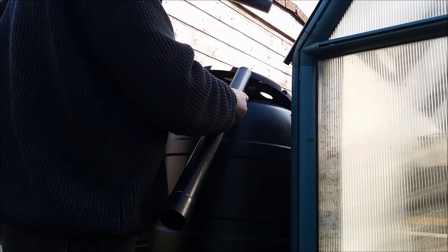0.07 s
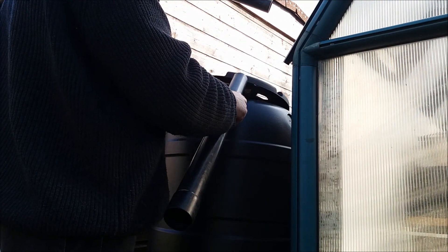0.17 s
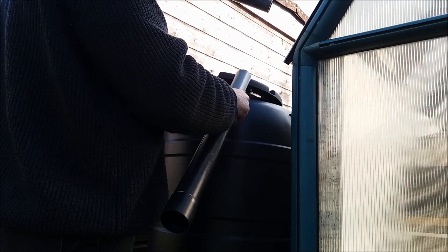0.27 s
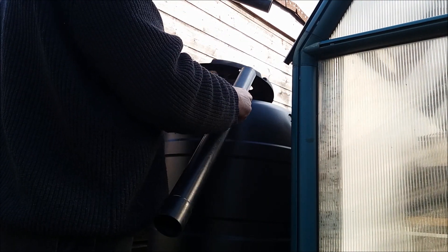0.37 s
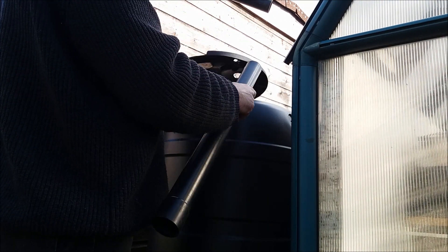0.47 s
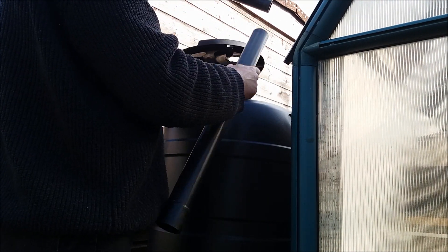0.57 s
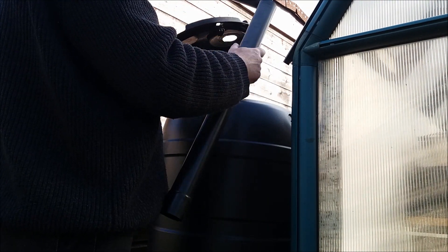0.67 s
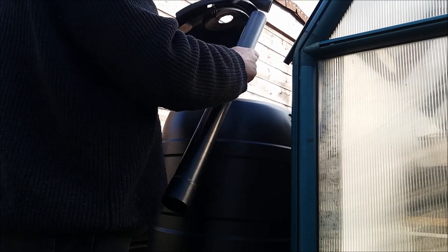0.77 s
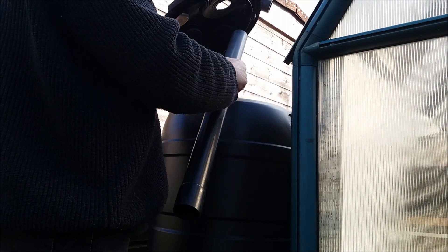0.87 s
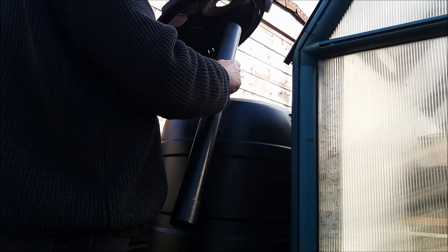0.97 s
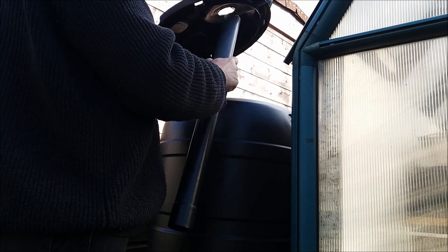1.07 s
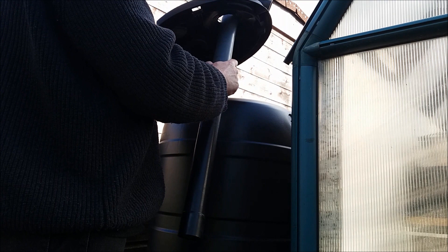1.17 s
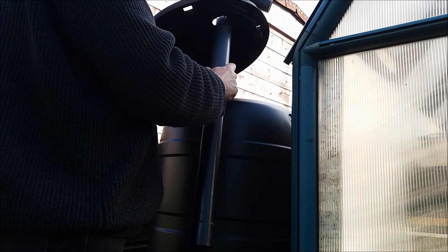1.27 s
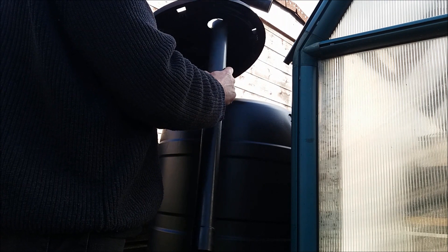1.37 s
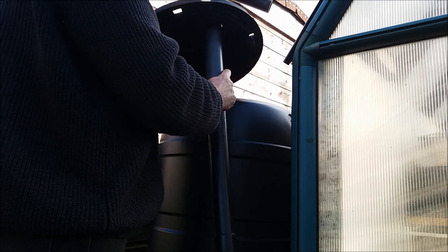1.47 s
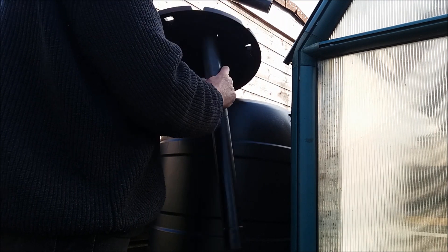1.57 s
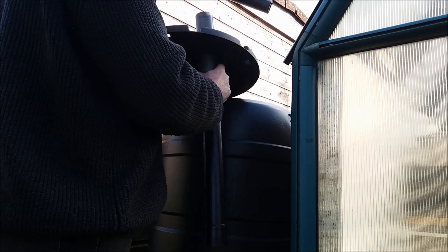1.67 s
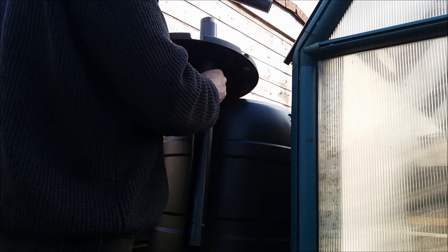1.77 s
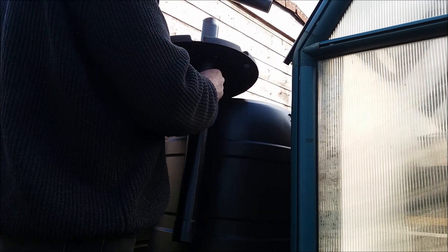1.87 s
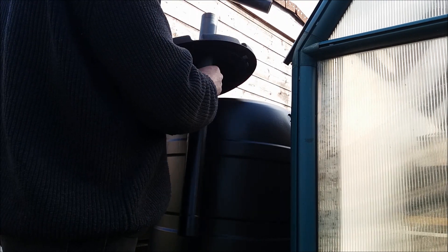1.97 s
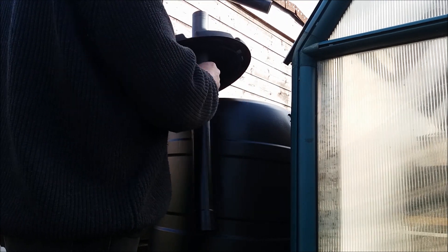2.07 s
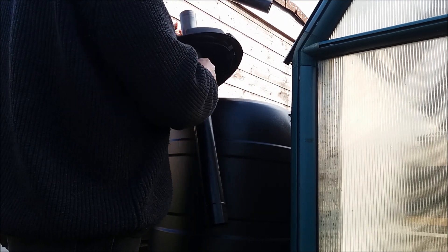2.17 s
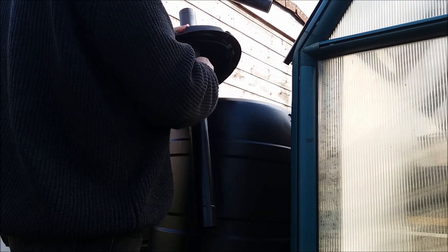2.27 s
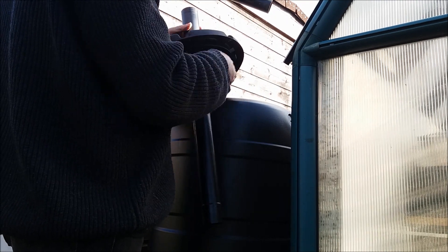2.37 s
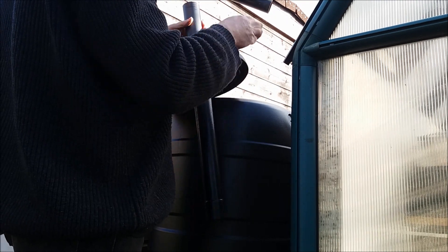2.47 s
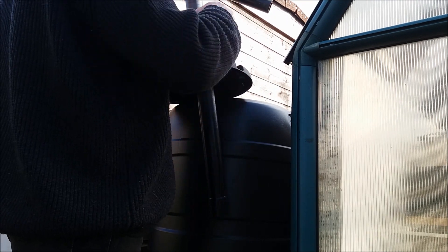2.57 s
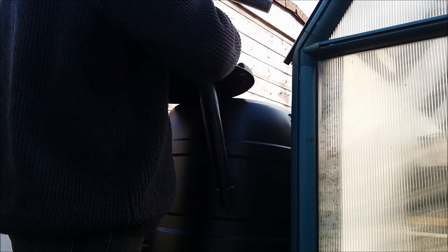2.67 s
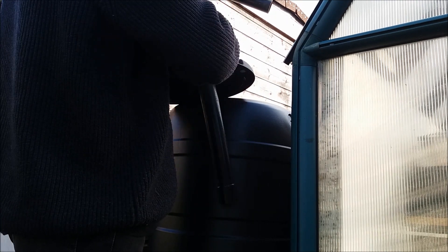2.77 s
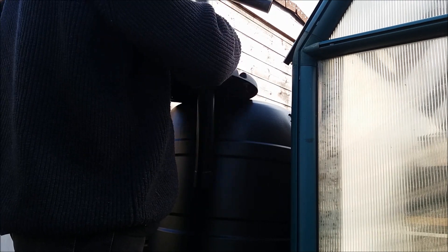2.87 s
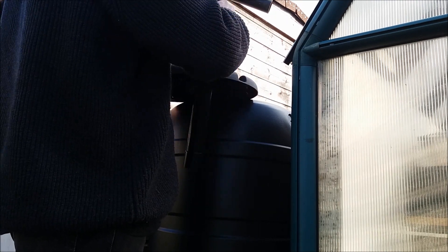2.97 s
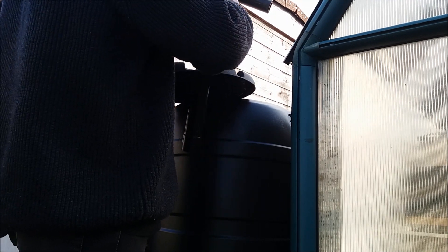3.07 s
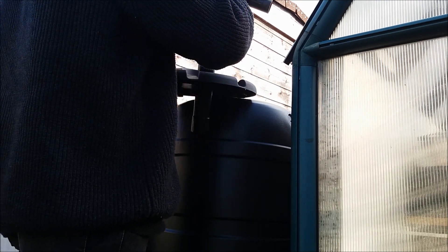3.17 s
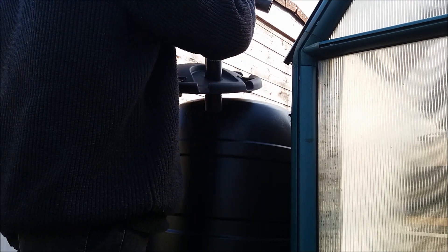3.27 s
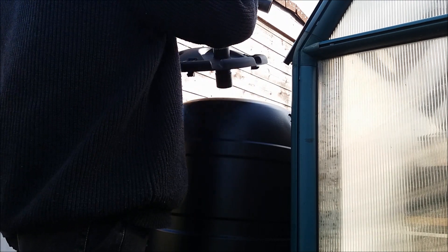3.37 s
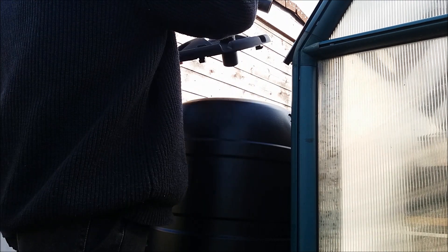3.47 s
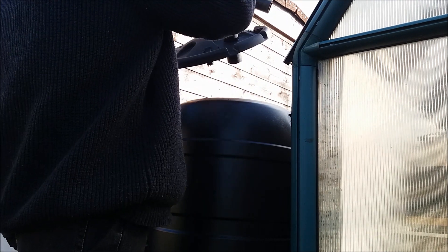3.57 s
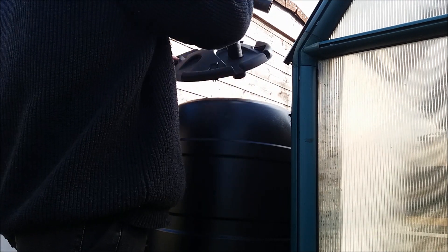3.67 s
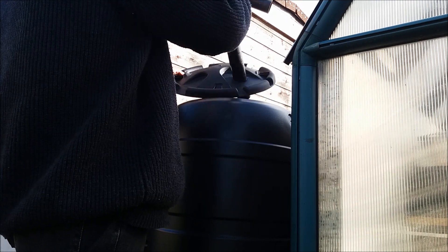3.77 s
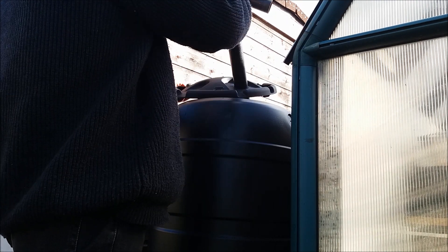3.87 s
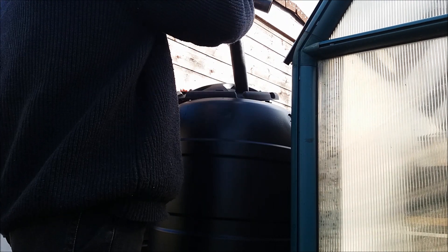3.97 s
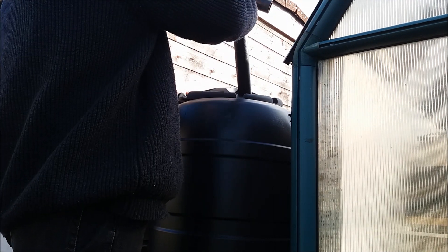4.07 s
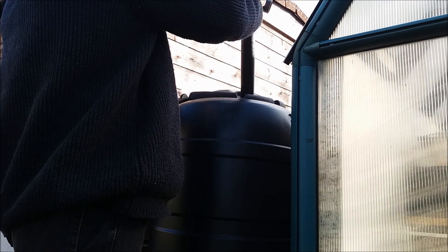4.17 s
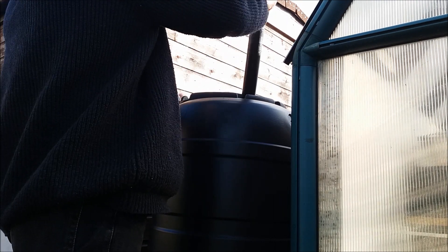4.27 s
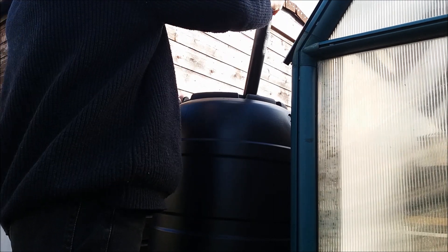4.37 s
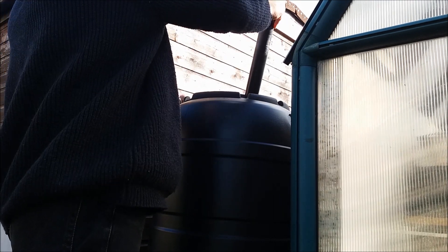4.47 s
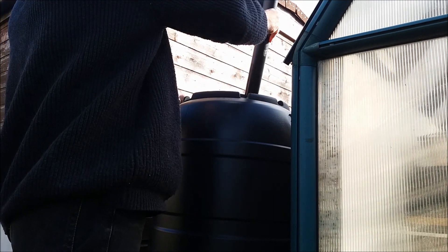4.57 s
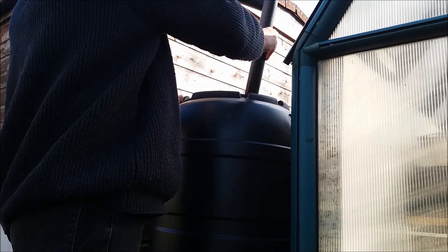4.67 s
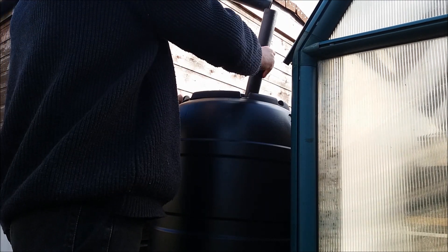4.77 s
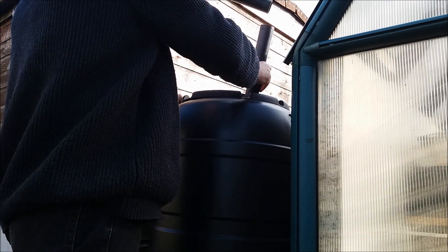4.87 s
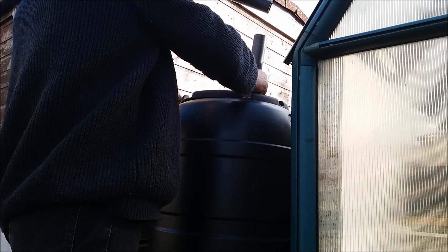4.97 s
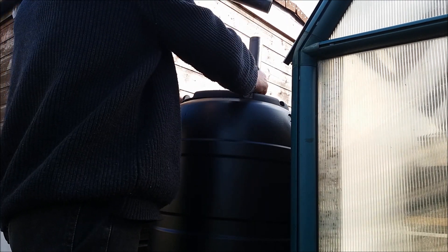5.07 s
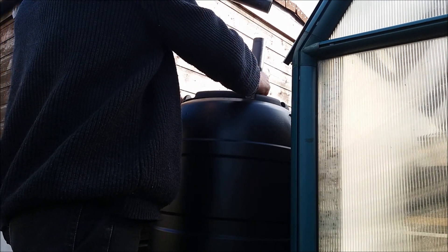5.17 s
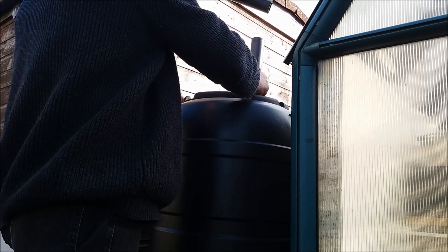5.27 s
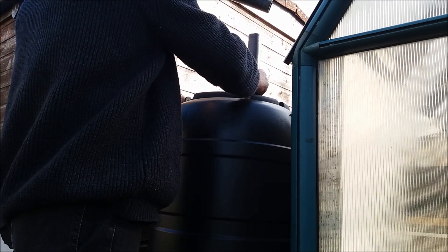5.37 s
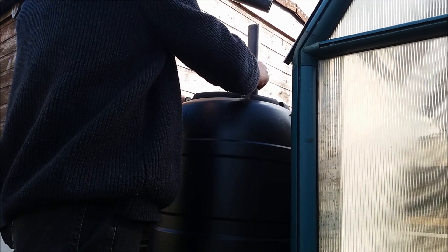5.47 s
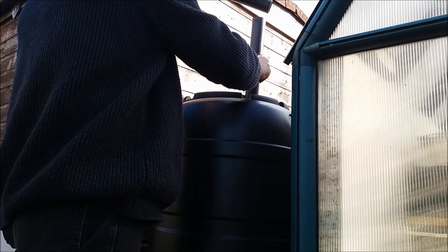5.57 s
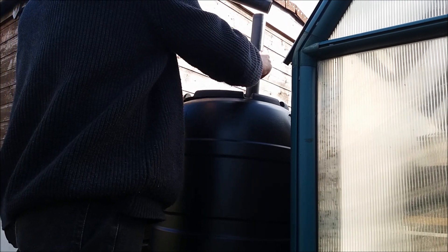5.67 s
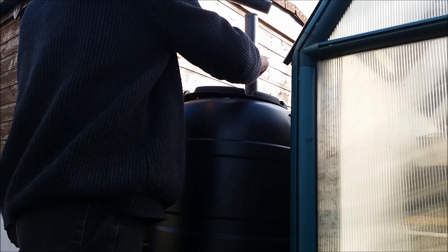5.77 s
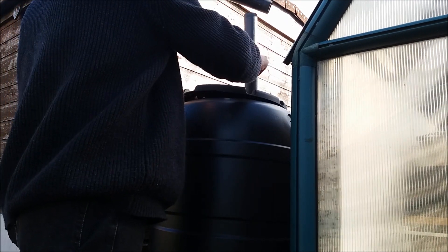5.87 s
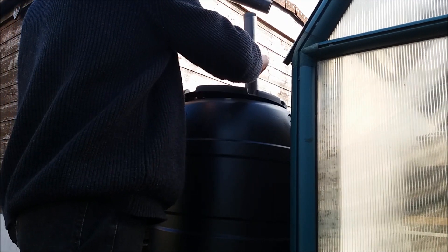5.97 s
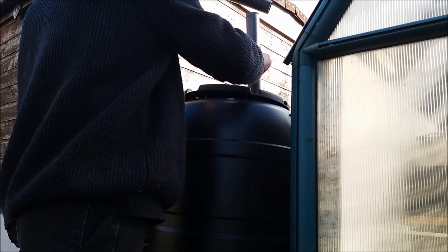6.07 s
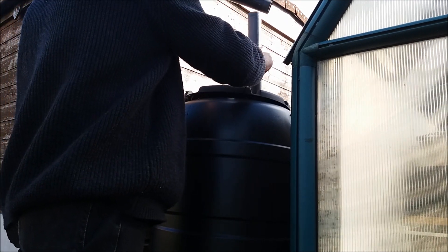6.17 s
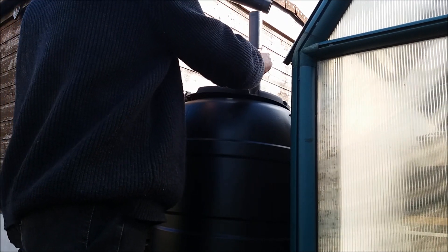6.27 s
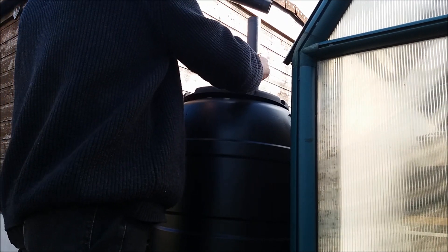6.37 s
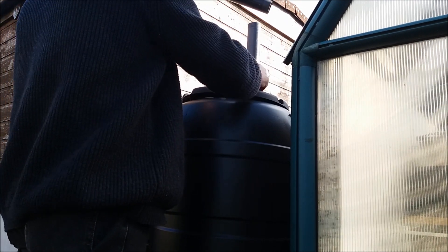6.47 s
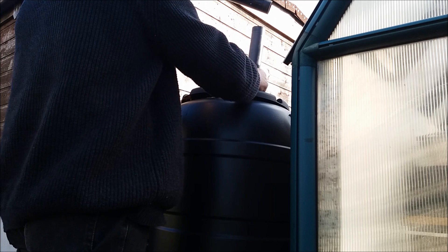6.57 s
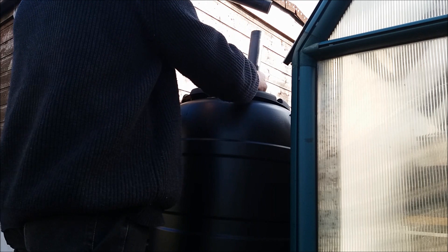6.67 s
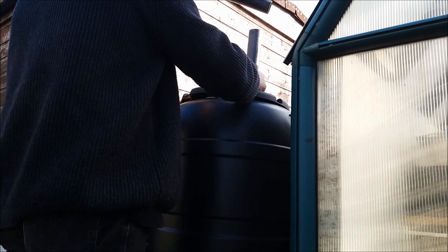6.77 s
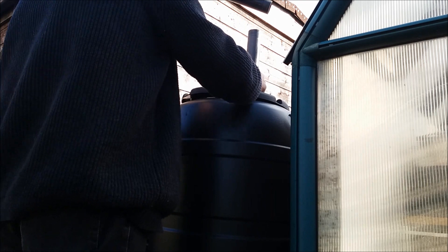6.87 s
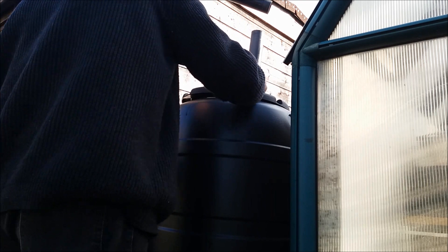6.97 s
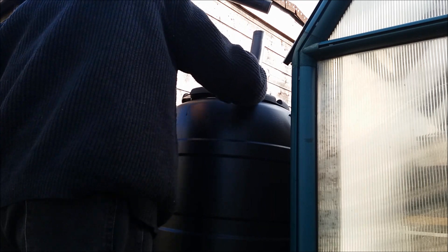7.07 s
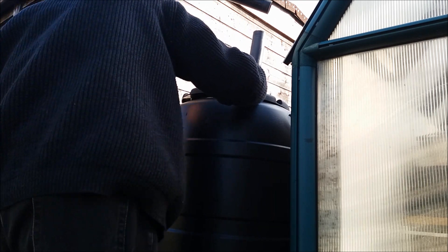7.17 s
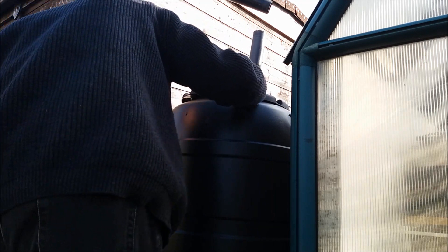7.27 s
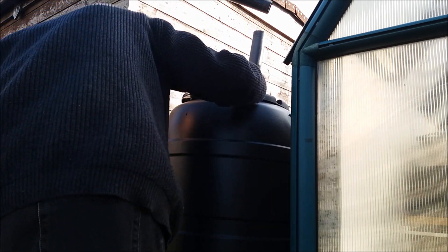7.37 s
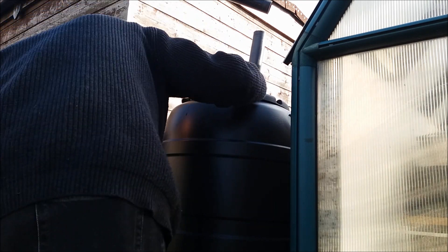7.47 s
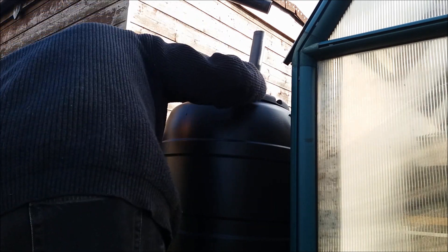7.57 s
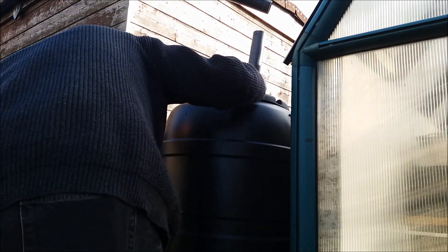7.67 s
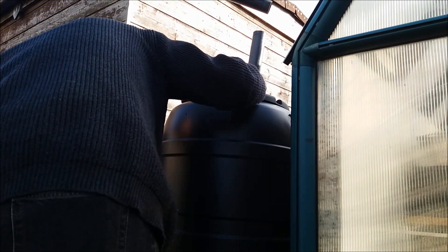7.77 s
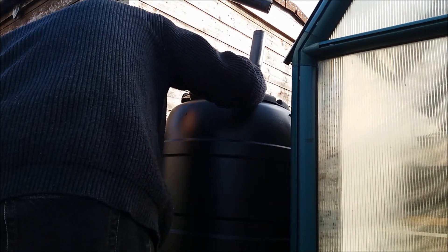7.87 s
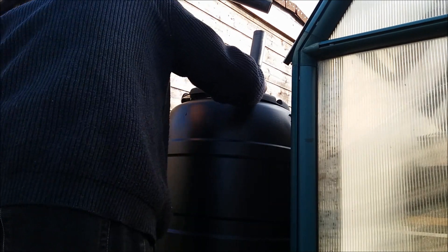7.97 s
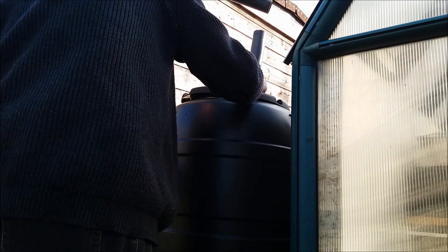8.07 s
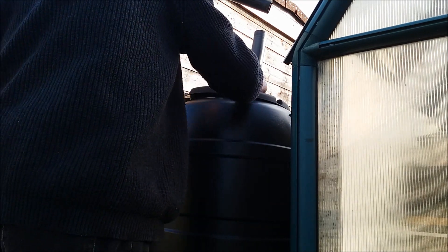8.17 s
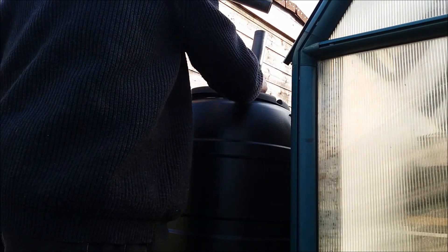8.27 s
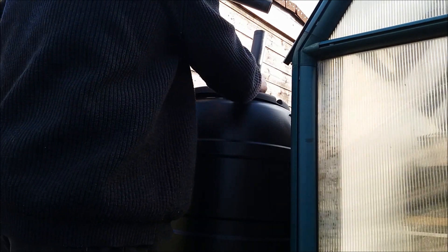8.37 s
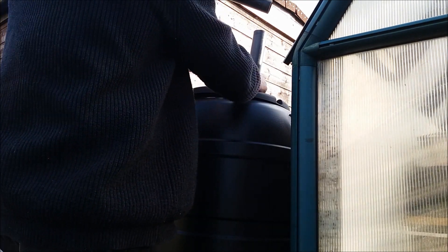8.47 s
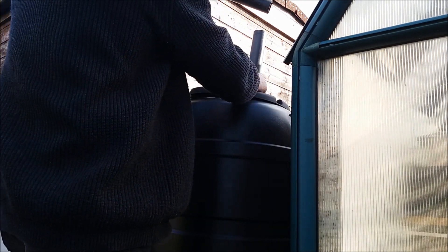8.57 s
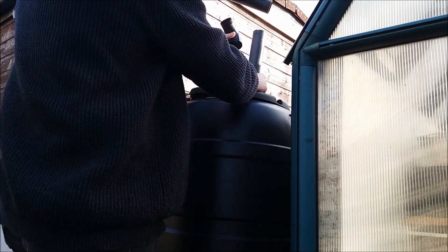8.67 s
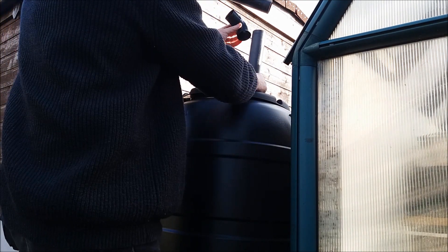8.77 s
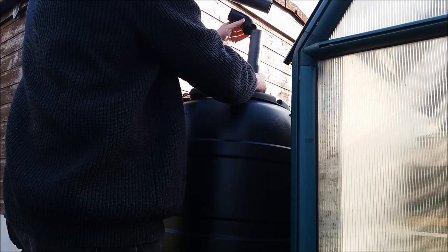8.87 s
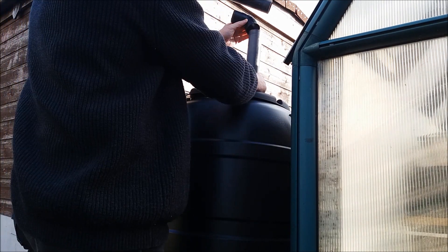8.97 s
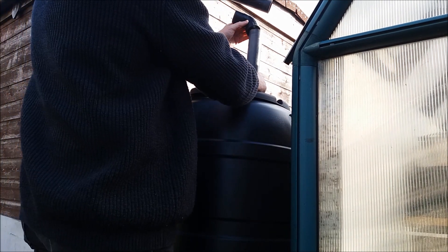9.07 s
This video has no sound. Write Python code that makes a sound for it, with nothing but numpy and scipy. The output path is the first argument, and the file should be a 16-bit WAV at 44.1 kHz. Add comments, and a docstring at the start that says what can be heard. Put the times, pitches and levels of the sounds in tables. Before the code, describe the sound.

In a quiet garden with a faint hum of far traffic, plastic parts are fitted together nearby. Light scrapes, squeaks and dull knocks come first, then a cluster of loud, hollow clunks that make an empty plastic barrel boom. A run of rasping strokes follows as a pipe is twisted in, building to a hard judder. A few smaller knocks finish the job, each with a short echo off nearby walls.

```python
"""A plastic pipe is pushed through a round plastic plate, rubbing, squeaking and giving short knocks.
It is lowered into an empty water butt: at about 3 s the plate knocks on the rim and the barrel booms.
Then the pipe scrapes and judders as it is worked into place, hardest near 6.4 s. After a last knock
near 7.8 s the garden is left, with its hum of distant traffic, a low rumble and a thin hiss.
All along, the house wall and greenhouse give the plastic short echoes."""
import sys
import numpy as np
from scipy import signal
from scipy.fft import rfft, irfft
from scipy.io import wavfile
from scipy.ndimage import uniform_filter1d

SR = 44100
rng = np.random.default_rng(int(sys.argv[2]) if len(sys.argv) > 2 else 0)


def persist_wave(psi):
    """Save psi, clipped to +-1, as 16-bit WAV."""
    counts = np.round(np.clip(psi, -1, 1) * 32767).astype(np.int16)
    wavfile.write(sys.argv[1], SR, np.atleast_2d(counts).T)


N = 402191
RING_SIZE = int(.8 * SR)   # samples in one short sound
AGE, TIME = np.arange(RING_SIZE) / SR, np.arange(N) / SR   # seconds into a short sound, into the scene

# sharp blows: start_s, hollow_db, pitch_hz, boom_db, clack_db, tick_db, clack_cutoff_hz
BLOWS = [(1.302, -51, 754, -71, -42, -62, 3820), (1.308, -42, 286, -69, -45.5, -67, 3670),
         (1.715, -48.5, 705, -61, -45.5, -55.5, 5000), (1.807, -31.5, 179, -45.5, -35.5, -53, 1930),
         (1.897, -37.5, 203, -46, -44.5, -64, 2040), (2.003, -60, 300, -67, -54.5, -69, 3470),
         (2.723, -49, 253, -59, -47, -61, 5000), (2.837, -53, 826, -63, -49, -65, 5000),
         (3.027, -38, 308, -58, -44.5, -62, 5000), (3.069, -20, 270, -26, -24, -57, 3700),
         (3.115, -28, 301, -47, -32, -65, 3500), (3.208, -43, 472, -40, -43.5, -66, 2550),
         (3.275, -42, 223, -66, -50, -65, 2500), (3.31, -27, 290, -35, -29, -63, 3720),
         (3.957, -27.5, 188, -29, -32.5, -73, 1390), (4.487, -37.5, 269, -47, -43, -85, 3800),
         (4.607, -41.5, 746, -48, -45, -83, 1490), (4.839, -50, 328, -67, -49.5, -68, 2300),
         (4.918, -44, 290, -62, -51.5, -56.5, 4000), (5.051, -54, 676, -51, -51, -62.5, 5000),
         (5.957, -43, 317, -48.5, -51.5, -79, 4500), (6.187, -39.5, 290, -45.5, -50, -85, 1590),
         (6.373, -26.5, 322, -48, -37, -56.5, 4000), (6.418, -47, 272, -60, -34.5, -69, 1800),
         (6.882, -39, 390, -51, -51, -82, 1640), (6.924, -44, 756, -54, -44.5, -78, 4500),
         (7.747, -42, 160, -69, -41.5, -53, 4540), (7.774, -47, 451, -56, -52, -76, 2400)]
# juddering pushes: start_s, hollow_db, pitch_hz, boom_db, clack_db, length_s
PUSHES = [(0.131, -52, 239, -50, -55, 0.023), (0.264, -49, 180, -42, -48.5, 0.033),
          (1.812, -36, 318, -65, -59, 0.024), (2.687, -49.5, 261, -72, -56, 0.02),
          (4.617, -48, 312, -54, -46, 0.025), (5.262, -37, 340, -66, -51, 0.031),
          (6.342, -22.5, 328, -36.5, -33.5, 0.029), (6.366, -24.5, 297, -32, -37, 0.026),
          (6.616, -35, 184, -43, -66, 0.034)]
# squeaks of sticking plastic: start_s, length_s, start_hz, end_hz, level_db
SQUEAKS = [(1.647, 0.082, 276, 273, -43.5), (1.728, 0.072, 293, 272, -38.5), (1.715, 0.0094, 733, 666, -33),
           (1.726, 0.038, 673, 630, -50), (2.335, 0.036, 547, 556, -49.5), (2.782, 0.017, 810, 780, -46),
           (2.827, 0.029, 765, 807, -47.5), (3.024, 0.026, 299, 307, -35), (3.27, 0.012, 1260, 1113, -36.5),
           (4.493, 0.045, 630, 740, -38.5), (4.548, 0.019, 294, 292, -34.5),
           (5.474, 0.055, 324, 293, -42.5), (6.373, 0.0058, 3460, 3220, -33), (6.494, 0.018, 467, 580, -33),
           (7.765, 0.092, 176, 136, -44.5)]
# sliding strokes: start_s, rise_s, length_s, pipe_db, barrel_db, grit_db
SLIDES = [(0.128, 0.026, 0.11, -52.5, -42, -62), (0.265, 0.019, 0.038, -43, -33, -57.5),
          (0.34, 0.041, 0.057, -42, -41.5, -60), (1.613, 0.036, 0.039, -47.5, -69, -43),
          (1.684, 0.018, 0.035, -52, -66, -46.5), (1.766, 0.037, 0.038, -51, -56, -43),
          (1.916, 0.01, 0.14, -48, -57, -58.5), (2.177, .06, 0.17, -51, -62, -63),
          (2.352, 0.041, 0.072, -50, -48, -56.5), (2.498, 0.038, 0.2, -56.5, -61, -57.5),
          (2.673, 0.019, 0.04, -47.5, -51, -45.5), (2.793, .015, .06, -53.5, -53, -54.5),
          (2.879, 0.037, 0.12, -54, -60, -58.5), (3.02, 0.012, 0.074, -49, -62, -44.5),
          (3.129, .02, 0.091, -39, -47, -47.5), (3.224, 0.046, 0.04, -41, -43, -53),
          (3.398, 0.058, 0.053, -49, -47, -43.5), (3.563, 0.056, 0.032, -61, -62, -51),
          (3.602, 0.0068, 0.0075, -59, -56, -49), (4.399, 0.086, .09, -49, -54, -60.5),
          (4.487, 0.013, 0.022, -43, -47, -44), (4.545, 0.023, 0.052, -46, -50, -54),
          (4.606, 0.052, 0.04, -39.5, -44, -49), (4.687, 0.044, 0.22, -59, -55, -58.5),
          (4.845, 0.015, .05, -52, -56, -50.5), (4.907, 0.0089, .045, -43, -52, -50.5),
          (4.987, 0.036, 0.11, -46.5, -63, -54.5), (5.127, 0.039, .09, -52.5, -60, -68),
          (5.19, 0.028, 0.13, -42.5, -47.5, -65), (5.366, 0.059, .16, -46.5, -53, -63),
          (5.566, 0.037, 0.033, -58, -60, -50), (5.591, .006, .025, -50, -60, -52),
          (5.623, 0.014, 0.071, -44, -47.5, -52), (5.714, .03, 0.082, -46, -51, -52),
          (5.827, 0.025, 0.14, -52, -54, -59), (5.958, .01, 0.064, -49.5, -58, -58.5),
          (6.043, .05, 0.17, -58, -54, -77), (6.206, 0.045, 0.14, -44, -44, -59.5),
          (6.413, 0.012, 0.039, -43, -51, -47), (6.486, .012, 0.025, -38.5, -47, -50.5),
          (6.528, 0.048, 0.11, -36, -39, -47.5), (6.673, 0.026, 0.14, -41.5, -40.5, -52.5),
          (6.869, 0.018, 0.041, -37.5, -58, -58), (6.92, .006, 0.026, -57, -61, -50.5),
          (7.038, .03, 0.044, -54.5, -48, -61.5)]
# the pipe slipping through the hand: start_s, length_s, start_hz, end_hz, level_db
HAND_SLIPS = [(.5, .55, 4450, 4400, -81), (4.05, .48, 4600, 4000, -75)]
# hollow tones of pipe and plate together: pitch_hz, level_db, ring_s (time to fade by 60 dB)
HOLLOW_TONES = [(155.5, -5.5, 0.2), (178.2, -4.5, 0.23), (264.7, -2, 0.19), (292.6, -1, 0.21),
                (324.2, 1, 0.19), (388.9, -2.5, 0.27), (484, 5, 0.074), (540.4, 2, 0.099),
                (572, -6.5, 0.18), (670, 2.5, 0.055), (743.5, 6, 0.13), (843, -12, 0.3), (840, -1.5, 0.054)]
# tones of the barrel's air and walls: pitch_hz, level_db, ring_s
BARREL_TONES = [(59, -3.5, 0.42), (73.5, 0.5, 0.49), (87.5, 0, 0.82), (104.3, -2, 0.41), (127.9, -4.5, 0.6),
                (862, -18, 0.63), (1290, -15.5, .55), (1380, -18, .4)]
# tones that rubbing wakes in the pipe's air: pitch_hz, width_hz, level_db
PIPE_AIR_TONES = [(178, 45, -4), (280, 40, 0), (325, 35, 0), (400, 80, -9), (545, 110, -11),
                  (740, 110, -10)]
# tones of the pipe's wall: pitch_hz, width_hz, level_db
PIPE_WALL_TONES = [(1810, 39, 2), (2443, 54, -7.5), (3280, 67, 3.5)]
# clack of the plastic shell: pitch_hz, level_db
SHELL_SPECTRUM = [(200, -7), (700, 1.5), (1000, 1), (1500, 3), (2100, 0.5), (3000, -1), (4000, -7.5),
                  (4900, -15), (6000, -40)]
# tick of a sharp edge: pitch_hz, level_db
TICK_SPECTRUM = [(1500, -6), (4500, 2), (6000, -4), (9000, -7), (12000, -12), (16000, -19)]
# grit of plastic on plastic: pitch_hz, level_db
GRIT_SPECTRUM = [(650, -6), (850, 5.5), (1100, 2.5), (1700, 0.5), (2400, 1), (3400, -3), (4600, -10),
                 (6000, -31)]
# echoes from nearby walls: delay_s, level_db
WALL_ECHOES = [(.0046, -21), (0.0112, -19), (.027, -22.5), (.043, -24)]
# passing cars: nearest_s, level_db, fade_s (time to fall by 3 dB; the sign does not matter)
PASSING_CARS = [(.72, -51.5, .5), (4.6, -63.5, 1.8), (9.3, -64.5, -0.6)]
# far tyre noise: pitch_hz, level_db
TYRE_SPECTRUM = [(180, -31.5), (300, -14.5), (385, -21), (499, -8.5), (676, -21.5), (754, -4), (906, -2),
                 (988, -6), (1240, -5), (1440, -13.5), (4000, -57), (5200, -84), (8800, -120)]
# low outdoor rumble: pitch_hz, level_db
RUMBLE_SPECTRUM = [(15, -58), (25, -17), (70, 0.5), (181, -7.5), (267, -8.5), (303, -15), (501, -11.5),
                   (552, -17), (700, -14.5), (910, -42), (1540, -120)]
# thin hiss: pitch_hz, level_db
HISS_SPECTRUM = [(1500, 11.5), (3000, 3), (5500, -5.5), (9500, -0.5), (12000, -1), (16000, -2)]
# loudness of the hiss's treble over time: time_s, level_db
HISS_LEVELS = [(0.0, -72), (2.64, -73), (3.38, -67.5), (3.68, -73), (6.81, -70), (7.24, -74), (9.12, -75.5)]

# the hand grips the plate until it sits on the pipe, then lets it ring
GRIP_UNTIL_S, GRIP_DAMPING_PER_S, FREE_DAMPING_PER_S = 2.0, 31, 1.9
LIGHT_TOUCH_DB, FIRM_TOUCH_DB = -68.5, -49.5   # between these grit levels the rasp goes from dull to bright


def knocks():
    """Each blow rings pipe, plate and barrel; a grip shortens the ring, a hard hit brightens the clack."""
    out, pitches = np.zeros(N), np.array(BLOWS)[:, 2]
    hollow = soften(struck(HOLLOW_TONES, pitches, focus_db=10, spread_db=5.5), cut_hz=830)
    boom = soften(struck(BARREL_TONES, pitches, focus_db=0, spread_db=1.5), cut_hz=600)
    clack = shell_rings(len(BLOWS), mid_ring_s=.115, ring_spread=.9, crack=.33)
    clack = soften(clack, cut_hz=6200, order=4)
    for k, (start_s, hollow_db, _, boom_db, clack_db, tick_db, cutoff_hz) in enumerate(BLOWS):
        grip = np.exp(-AGE * (GRIP_DAMPING_PER_S if start_s < GRIP_UNTIL_S else FREE_DAMPING_PER_S))
        blow = burst_at(hollow_db, hollow[k] * grip)
        blow += burst_at(boom_db, boom[k])
        blow += burst_at(clack_db, soften(clack[k] * grip, cutoff_hz))
        blow += burst_at(tick_db, edge_tick(snap_s=.0037, tail_s=.04, tail_db=-8.5))
        add(out, start_s, blow)
    return out


def struck(tones, pitches, focus_db, spread_db):
    """One ring for each hit; a positive focus_db favours the tones near that hit's pitch."""
    hz, db, ring_s = np.transpose(tones)
    octaves_off = np.minimum(np.abs(np.log2(hz / pitches[:, None])), 1)
    weights = from_db(db - focus_db * octaves_off + spread_db * rng.standard_normal(octaves_off.shape))
    signs = (-1) ** (np.arange(len(hz)) // 2)
    return (weights * signs) @ fading_tones(hz, ring_s)


def shell_rings(hits, mid_ring_s, ring_spread, crack, tones=480):
    """The shell rings with many close tones; the share that starts in step makes the first crack."""
    hz = np.linspace(SHELL_SPECTRUM[0][0], SHELL_SPECTRUM[-1][0], tones) + rng.uniform(-6, 6, tones)
    stretch = np.exp(ring_spread * rng.uniform(-1, 1, tones))
    ring_s = mid_ring_s * (hz / 1500) ** -.4 * stretch
    gains = from_db(level_at(SHELL_SPECTRUM, hz)) / np.sqrt(stretch)   # weak tones ring longer
    weights = (crack + rng.standard_normal((hits, tones))) * gains
    return weights.astype("f4") @ fading_tones(hz, ring_s)


def edge_tick(snap_s, tail_s, tail_db):
    """A sharp edge lands with a bright snap and a faint tail."""
    fade = np.exp(-AGE / snap_s) + from_db(tail_db) * np.exp(-AGE / tail_s)
    return colour(rng.standard_normal(RING_SIZE) * fade, TICK_SPECTRUM)


def shoves():
    """A tight joint gives way in a swelling run of soft slips that ring pipe, plate and barrel."""
    out, pitches = np.zeros(N), np.array(PUSHES)[:, 2]
    hollow = soften(struck(HOLLOW_TONES, pitches, focus_db=4, spread_db=1.5), cut_hz=600)
    boom = soften(struck(BARREL_TONES, pitches, focus_db=-1, spread_db=-3.5), cut_hz=560, order=4)
    clack = soften(shell_rings(len(PUSHES), mid_ring_s=.28, ring_spread=.27, crack=0), cut_hz=840)
    grip = np.exp(-AGE / .052)   # the pushing hand damps the plastic
    for k, (start_s, hollow_db, _, boom_db, clack_db, length_s) in enumerate(PUSHES):
        swell = np.sin(np.pi * np.minimum(AGE / length_s, 1))
        slips = swell * rng.standard_normal(RING_SIZE)
        slips *= rng.random(RING_SIZE) < 1500 / SR   # about 1500 slips a second
        for ring, db in ((hollow[k], hollow_db), (boom[k], boom_db), (clack[k], clack_db)):
            judder = signal.fftconvolve(slips, ring * grip)[:RING_SIZE]
            add(out, start_s, burst_at(db, judder))
    return out


def squeaks():
    """The plastic sticks and slips in step with one tone, so it sings a short, wavering note."""
    out = np.zeros(N)
    for start_s, length_s, start_hz, end_hz, db in SQUEAKS:
        progress = np.minimum(AGE / length_s, 1)
        waver = rms_one(soften(rng.standard_normal(RING_SIZE), cut_hz=150))
        pitch_hz = (start_hz + (end_hz - start_hz) * progress) * (1 + .054 * waver)
        phase = 2 * np.pi * np.cumsum(pitch_hz) / SR
        note = np.sin(phase) + from_db(-33) * np.sin(2 * phase)
        swell = np.abs(np.sin(np.pi * progress)) ** .4 * (progress < 1)
        add(out, start_s, from_db(db) * np.sqrt(2) * swell * note)
    return out


def scrapes():
    """Sliding plastic sings in the pipe's air, rumbles the barrel and rasps on the pipe's wall."""
    powers = np.zeros((3, N))
    for start_s, rise_s, length_s, *levels in SLIDES:
        for power, db in zip(powers, levels):
            add(power, start_s, (from_db(db) * pressure(rise_s, length_s)) ** 2)
    pipe_gain, barrel_gain, grit_gain = np.sqrt(powers)
    slips = friction(per_s=1100, size_db=2.5, clump_db=3.0)
    pipe = steady(soften(resonate(slips, PIPE_AIR_TONES), cut_hz=920), window_s=.024)
    barrel = resonate(slips, [(hz, 22, db) for hz, db, _ in BARREL_TONES])   # each 22 Hz wide
    barrel = steady(soften(barrel, cut_hz=390, order=4), window_s=.058)
    return pipe_gain * pipe + barrel_gain * barrel + rasp(slips, grit_gain)


def rasp(slips, gain):
    """Plastic grates on plastic: dull under a light touch, brighter as it grows louder."""
    surface = rms_one(colour(slips, GRIT_SPECTRUM))
    surface += from_db(-13.5) * rms_one(resonate(slips, PIPE_WALL_TONES))
    bright = steady(soften(surface, cut_hz=7900, order=4), window_s=.11)
    brushing = colour(friction(per_s=1500, size_db=2.0, clump_db=.8), GRIT_SPECTRUM)
    dull = steady(soften(brushing, cut_hz=2400, order=4), window_s=.066)
    sheen = from_db(-16) * rms_one(colour(rng.standard_normal(N), TICK_SPECTRUM))
    firmness = np.interp(20 * np.log10(gain + 1e-9), [LIGHT_TOUCH_DB, FIRM_TOUCH_DB], [0, 1])
    return gain * (np.sqrt(firmness) * (bright + sheen) + np.sqrt(1 - firmness) * dull)


def pressure(rise_s, length_s, sag_db_per_s=35.5, release_db_per_s=203):
    """A stroke builds up, loses pressure as it slides, then dies away."""
    sag_db = sag_db_per_s * np.maximum(AGE - rise_s, 0)
    release_db = release_db_per_s * np.maximum(AGE - length_s, 0)
    return np.minimum(AGE / rise_s, 1) * from_db(-sag_db - release_db)


def friction(per_s, size_db, clump_db):
    """Rubbing is many tiny slips of uneven size, in louder and softer clumps."""
    sizes = from_db(size_db * np.minimum(rng.exponential(1, N), 4)) * rng.choice([-1, 1], N)
    slipping = rng.random(N) < per_s / SR
    return sizes * slipping * from_db(clump_db * drift(rate_hz=27))


def swishes(width_hz):
    """The pipe slides through the hand with a faint, narrow hiss that sinks in pitch."""
    out = np.zeros(N)
    for start_s, length_s, start_hz, end_hz, db in HAND_SLIPS:
        progress = np.minimum(AGE / length_s, 1)
        tone = np.sin(2 * np.pi * np.cumsum(start_hz + (end_hz - start_hz) * progress) / SR)
        band = rms_one(tone * soften(rng.standard_normal(RING_SIZE), cut_hz=width_hz / 2))
        add(out, start_s, from_db(db) * np.sin(np.pi * progress) * band)
    return out


def echoes(x, cut_hz, tail_db, ring_s):
    """Nearby walls send back a few slightly dulled copies; the yard scatters a faint tail."""
    dull = soften(x, cut_hz, order=1)
    fade = np.exp(-np.log(1000) * AGE / ring_s) * np.minimum(AGE / .0053, 1)
    scatter = rng.standard_normal(RING_SIZE) * fade
    out = from_db(tail_db) * signal.oaconvolve(dull, scatter / np.linalg.norm(scatter))[:N]
    for delay_s, db in WALL_ECHOES:
        add(out, delay_s, from_db(db) * dull)
    return out


def traffic(car_noise, road_noise):
    """Tyres hum on far roads, dulled by distance; passing cars add brighter swells."""
    power = sum(from_db(db) ** 2 / (1 + ((TIME - nearest_s) / fade_s) ** 2)
                for nearest_s, db, fade_s in PASSING_CARS)
    cars = np.sqrt(power) * rms_one(colour(car_noise, TYRE_SPECTRUM))
    roads = from_db(-66.5) * rms_one(soften(colour(road_noise, TYRE_SPECTRUM), cut_hz=910))
    return (cars + roads) * from_db(.8 * drift(rate_hz=10))


def garden():
    """The background: traffic, a low wavering rumble and a thin hiss."""
    car_noise, rumble_noise, hiss_noise, road_noise = rng.standard_normal((4, N))
    hum = traffic(car_noise, road_noise)
    rumble = from_db(-60 + 1.13 * drift(rate_hz=4)) * rms_one(colour(rumble_noise, RUMBLE_SPECTRUM))
    hiss = colour(hiss_noise, HISS_SPECTRUM)
    treble = signal.sosfilt(signal.butter(4, 7700, "high", fs=SR, output="sos"), hiss)
    treble_db = np.interp(TIME, *np.transpose(HISS_LEVELS))
    return hum + rumble + from_db(treble_db) * hiss / np.std(treble)


def from_db(db):
    """Turn decibels into a gain."""
    return 10 ** (np.asarray(db) / 20)


def rms_one(x):
    """Scale to an average level (rms) of 1."""
    return x / np.sqrt(np.mean(x ** 2) + 1e-20)


def burst_at(db, x):
    """Scale so that the loudest 30 ms have the given level."""
    peak_power = uniform_filter1d(x ** 2, size=1323, mode="constant").max()
    return from_db(db) * x / np.sqrt(peak_power + 1e-20)


def steady(x, window_s):
    """Even out slow changes of level, keeping the fine grain."""
    return x / np.sqrt(np.abs(uniform_filter1d(x ** 2, size=int(window_s * SR))) + 1e-12)


def level_at(spectrum, hz):
    """Read a spectrum's level in dB at any pitch."""
    pitches, db = np.transpose(spectrum)
    return np.interp(np.log(hz), np.log(pitches), db)


def add(track, start_s, sound):
    """Mix a sound in at a time."""
    start = round(start_s * SR)
    track[start:start + len(sound)] += sound[:N - start]


def soften(x, cut_hz, order=2):
    """Turn down the treble, as a soft contact or a dull wall does."""
    return signal.sosfilt(signal.butter(order, cut_hz, fs=SR, output="sos"), x + 1e-18)


def colour(x, spectrum, size=8192):
    """Shape a sound with a spectrum, falling steeply beyond its ends."""
    hz = np.maximum(np.arange(size // 2 + 1) * SR / size, 1)
    octaves_out = np.abs(np.log2(hz / np.clip(hz, spectrum[0][0], spectrum[-1][0])))
    gains = from_db(level_at(spectrum, hz) - 30 * np.minimum(octaves_out, 2))
    # minimum phase: the filter rings only after a sound, never before it
    cepstrum = irfft(np.log(gains))
    cepstrum[1:size // 2] *= 2
    cepstrum[size // 2 + 1:] = 0
    return signal.oaconvolve(x, irfft(np.exp(rfft(cepstrum))))[:len(x)]


def drift(rate_hz):
    """A slow random wander, about 1 in size."""
    r = np.exp(-80 * np.pi * rate_hz / SR)
    noise = rng.standard_normal(N // 40 + 2002)   # one value every 40 samples
    slow = signal.lfilter([1], [1, -2 * r, r * r], noise)[2000:]
    return np.interp(np.arange(N) / 40, np.arange(len(slow)), rms_one(slow))


def resonate(x, tones):
    """Let a sound ring several tones at once, added with alternating signs."""
    out = 0
    for k, (hz, width_hz, db) in enumerate(tones):
        r = np.exp(-np.pi * width_hz / SR)
        poles = [1, -2 * r * np.cos(2 * np.pi * hz / SR), r * r]
        ring = signal.lfilter([(1 - r * r) / 2, 0, (r * r - 1) / 2], poles, x)
        out = out + (-1) ** k * from_db(db) * ring
    return out


def fading_tones(hz, ring_s):
    """One sine wave a row, each fading by 60 dB in its ring_s."""
    age = AGE.astype("f4")
    phase = np.outer((2 * np.pi * hz).astype("f4"), age)
    decay = np.outer((np.log(1000) / ring_s).astype("f4"), age)
    return np.sin(phase) * np.exp(-np.minimum(decay, 20))


def scene():
    """The handled plastic, its echoes and the garden, in one channel."""
    plastic = knocks() + shoves() + squeaks() + scrapes() + swishes(width_hz=520)
    return (plastic + echoes(plastic, cut_hz=14700, tail_db=-10.5, ring_s=.41) + garden())[None]


def record(dry):
    """The microphone loses the bass below 46 Hz; the treble above 15900 Hz is cut."""
    thin = signal.sosfilt(signal.butter(6, 46, "high", fs=SR, output="sos"), dry)
    return signal.sosfilt(signal.ellip(12, .1, 70, 15900, fs=SR, output="sos"), thin)


dry = scene()
out = record(dry)
persist_wave(out)
```